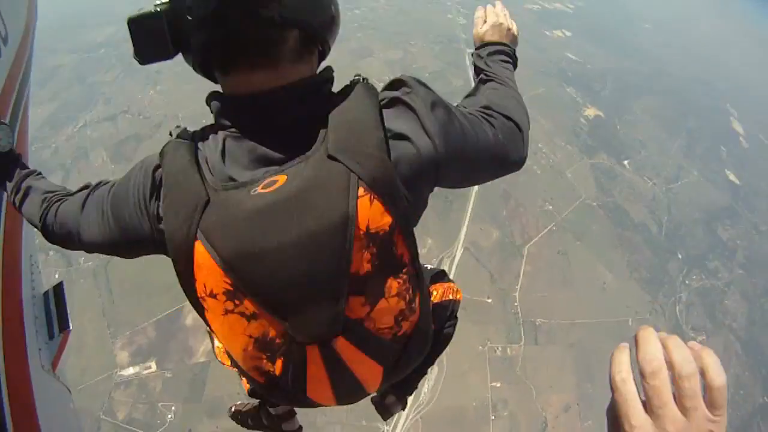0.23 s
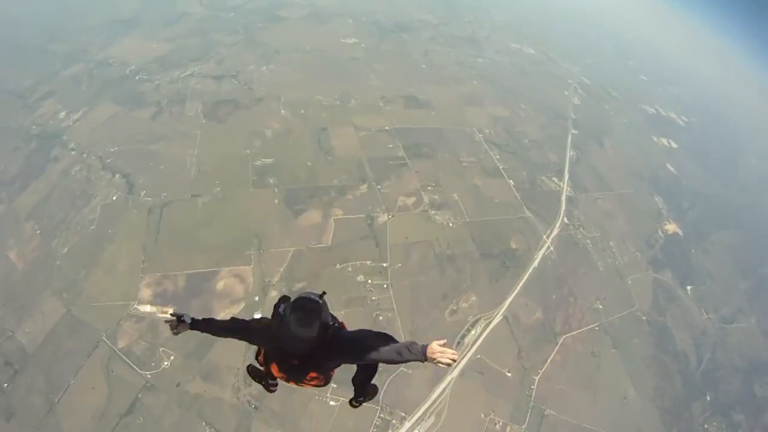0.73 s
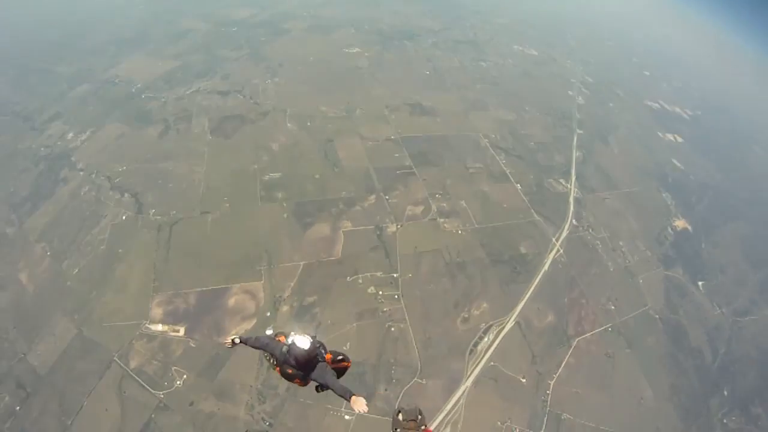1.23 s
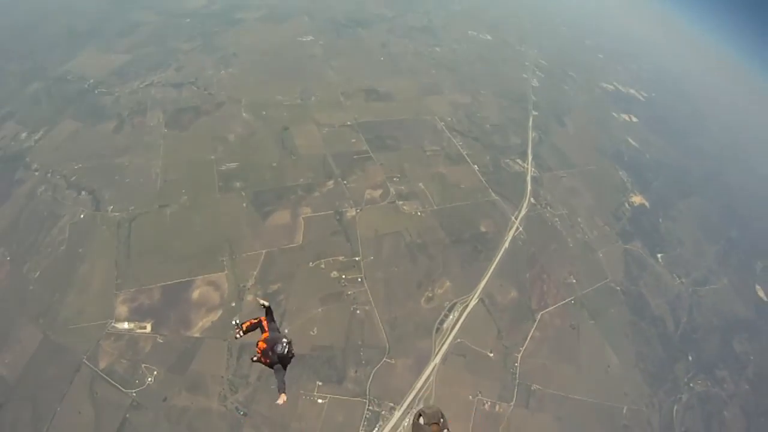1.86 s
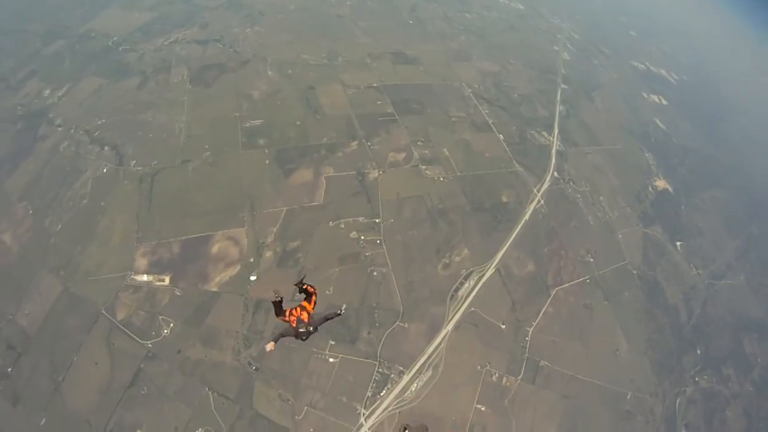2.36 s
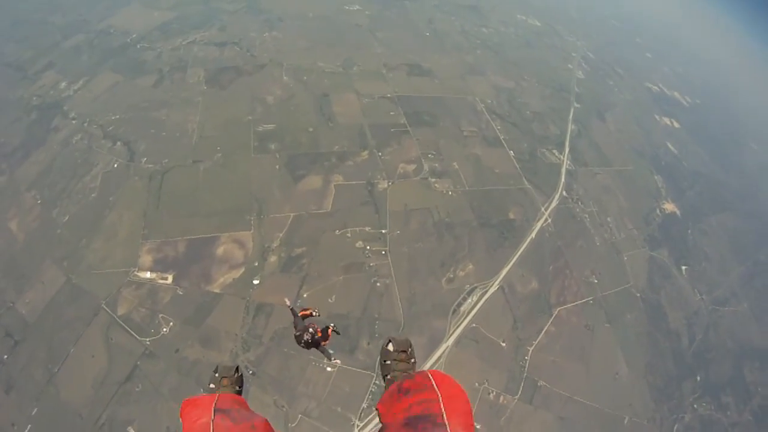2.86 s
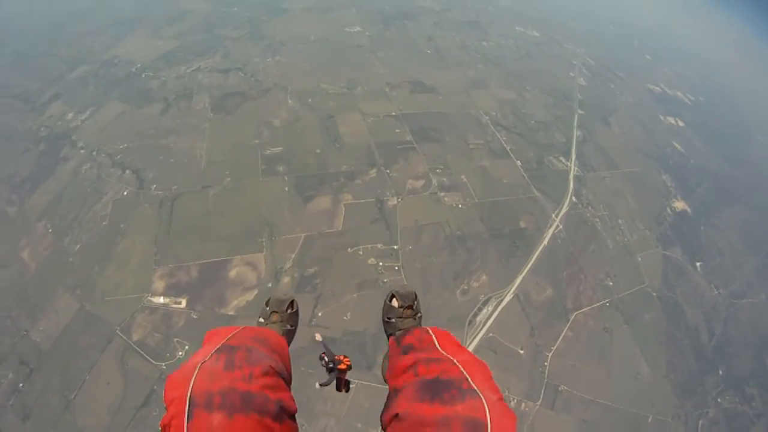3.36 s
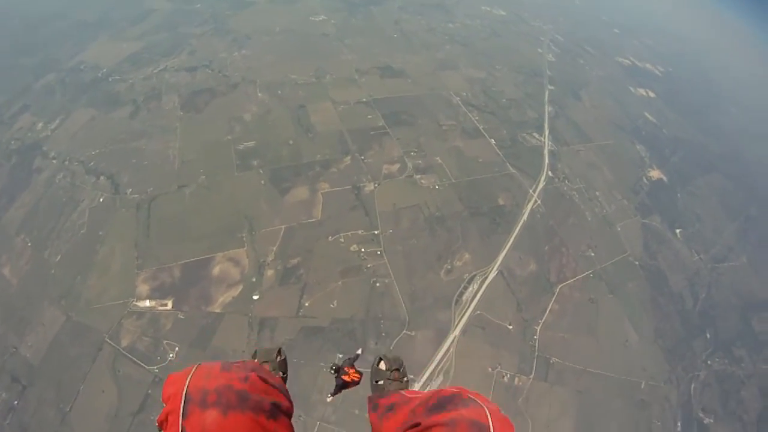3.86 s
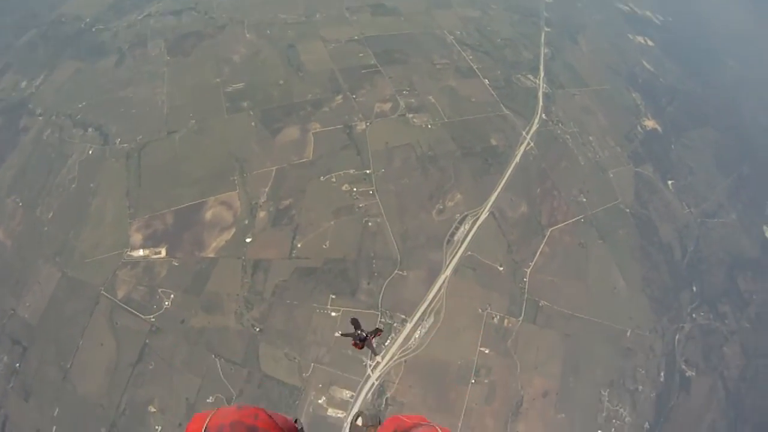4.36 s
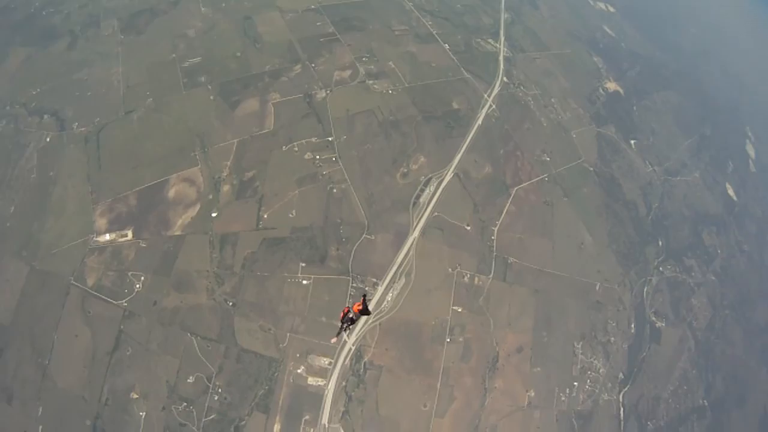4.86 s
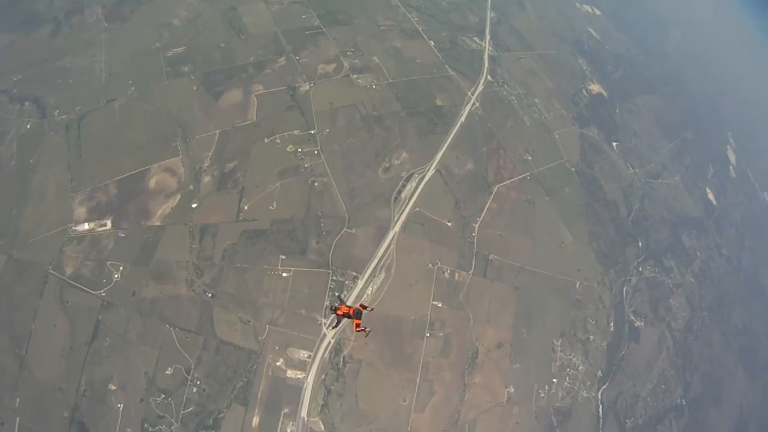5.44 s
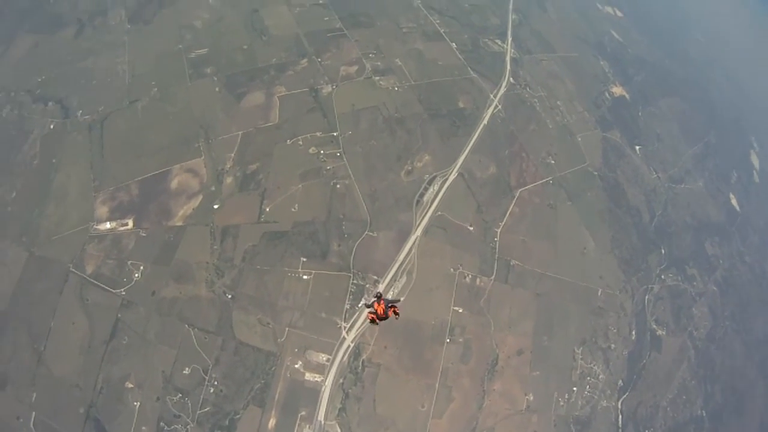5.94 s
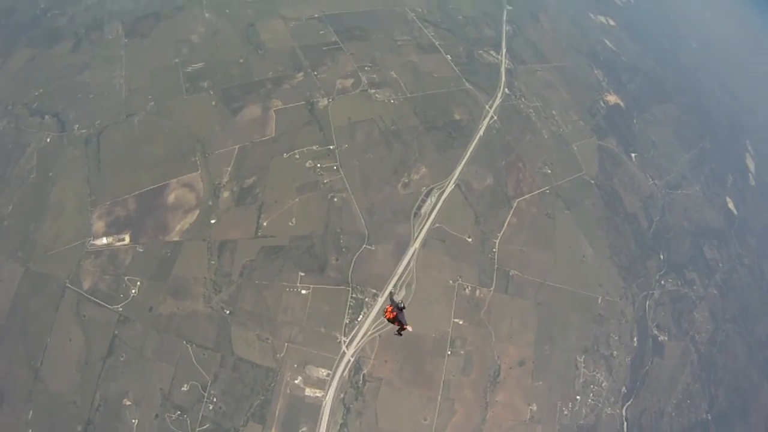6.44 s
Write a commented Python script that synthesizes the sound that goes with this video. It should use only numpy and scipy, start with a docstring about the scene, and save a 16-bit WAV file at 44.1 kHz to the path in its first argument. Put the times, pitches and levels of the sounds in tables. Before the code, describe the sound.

High in open air, wind blasts a helmet camera's microphone without pause. It starts as a strong, bright roar, drops within two seconds to a weaker rush over heavy low buffeting, then gets choppy with thumps, sudden lulls and short ripping gusts. The roar builds again late, with a low drone under it. The sound is close, mono, gritty and slightly overloaded, with no echo.

```python
"""A roar of wind heard by a helmet camera in free fall, with low buffeting, thumps and short rips of air.
Noise rings the housing's resonances for the slipstream; an unsteady tone and noise bands make the helmet's wake.
Big eddies thump, most swell the roar, and each leaves a lull. Gusts blow a slot that answers like a small pipe.
A low drone rises late. Slow sample-and-hold in the camera mirrors the roar into a gritty, banded hiss."""
import sys
import numpy as np
from scipy import signal
from scipy.fft import rfft, irfft, next_fast_len
from scipy.io import wavfile
from scipy.ndimage import uniform_filter1d, map_coordinates

SR = 44100
rng = np.random.default_rng(int(sys.argv[2]) if len(sys.argv) > 2 else 0)


def master_out(mix):
    """Clip the mix to full scale and print it as 16-bit PCM to the path in sys.argv[1]."""
    frames = np.transpose(np.atleast_2d(mix))
    ceiling = np.clip(frames, -1, 1)
    pcm = np.round(ceiling * 32767).astype(np.int16)
    wavfile.write(sys.argv[1], SR, pcm)


N = 295911

# Air stream before layer trims: (time [s], roar level [dB])
STREAM = [(0, -17.5), (.28, -16), (.55, -15.5), (.85, -20), (1.15, -24.5), (1.42, -26.5), (1.68, -30.5),
          (2.1, -27), (2.47, -23), (2.8, -27), (3.25, -24.5), (3.7, -26.5), (4.17, -23), (4.72, -29.5),
          (4.92, -21), (5.7, -19.5), (6.42, -17.5), (6.71, -20.5)]
# Flow as the head turns: (time [s], treble tilt [dB], seam sizzle [dB], lumpiness [1 = usual])
HEAD_FLOW = [(0, 2.5, 7.5, 0.58), (.6, -1, 2, .4), (1.2, 0.5, -1.5, 1.1), (1.75, -2.5, 3, 1.23),
             (2.8, -0.5, 1.5, 1.06), (3.05, -1, 0.5, 1.46), (3.4, 1.5, 7.5, 1.36), (4.25, -3, -1.5, 1.2),
             (4.9, 0.5, 7.5, 1.3), (5.35, -4.5, -5.5, 0.82), (6.05, -2, -0.5, .8), (6.5, -3, -4, 0.59),
             (6.71, -1, 5.5, 2.05)]
# Housing body resonances: (centre [Hz], width [Hz], relative level [dB])
BODY_MODES = [(777, 83, -4.5), (939, 157, -2.5), (1125, 52, 4), (1235, 70, -1), (1434, 380, -5),
              (1730, 276, -5.5)]
# Brighter housing cavity resonances: (centre [Hz], width [Hz], relative level [dB])
CAVITY_MODES = [(2048, 314, 2.5), (2340, 235, -1), (2738, 120, -6), (3050, 420, -13.5), (3624, 397, -10)]
# Sizzling housing seams: (centre [Hz], width [Hz], relative level [dB])
SEAM_MODES = [(4130, 470, -15), (4750, 820, 3.5), (4870, 240, 0.5), (5510, 810, -6.5)]
# Helmet wake before trims: (time [s], slow heaving [dB], buffet [dB], flutter [dB])
WAKE_LEVELS = [(0, -33, -24, -28.5), (.3, -37, -20, -23), (.7, -42, -26, -23), (.82, -25, -19.5, -21),
               (1.38, -15.5, -19, -30), (1.95, -21, -19, -27.5), (2.5, -26, -16, -26.5),
               (2.85, -21, -26, -31.5), (3.1, -22.5, -21.5, -28), (3.85, -26, -18, -34),
               (4.25, -19, -19, -26.5), (4.52, -23, -16.5, -35), (5.3, -28, -17.5, -25),
               (5.85, -33, -18.5, -24), (6.45, -28, -20, -24), (6.71, -40, -19.5, -24.5)]
# Eddy shedding: (time [s], mean rate [Hz], share of wake amplitude before trim [0-1])
SHEDDING_TRACK = [(0, 80, 0.9), (.5, 80.15, 0.9), (.85, 69.9, 0.25), (1.15, 41.8, 0.76), (1.8, 47.7, 0.9),
                  (2.2, 67, 0.65), (3.2, 70.9, 0.58), (3.6, 90.5, 0.82), (4.1, 81.12, 0.43),
                  (4.7, 88.03, .78), (5.3, 88.1, 0.84), (6.71, 87, 0.49)]
# Wake noise spectra: (frequency [Hz], relative density [dB])
HEAVE_SPECTRUM = [(8, -37), (20, -9), (32, -11), (45, 6), (55, -2), (75, -22), (140, -64)]
BUFFET_SPECTRUM = [(30, -66), (55, -4.5), (80, 4), (120, -5), (160, -11.5), (240, -28.5), (500, -59)]
FLUTTER_SPECTRUM = [(70, -35), (140, 0), (220, 0.5), (330, -4.5), (500, -12), (700, -16), (1200, -21),
                    (3000, -68)]
# Big eddies at the microphone: (time [s], signed push before trim, swell before [dB], lull after [dB])
BIG_EDDIES = [(0.832, -.4, 2.5, 3.5), (0.998, -0.13, -1, 2), (1.285, -0.04, -3, 4.5),
              (1.576, 0.35, -0.5, 1.5), (1.967, 0.46, 8, 2), (2.53, .7, 5.5, 0.5), (2.639, 0.32, 9, 6),
              (2.801, .58, 0, 2.5), (2.93, 0.54, 12.5, 13), (3.32, -0.71, 4, 1), (3.476, 0.58, 3.5, 0.5),
              (3.955, -0.17, -1, 7.5), (4.22, 0.33, 7.5, 4.5), (4.328, 0.49, 9.5, 2.5), (5.344, .1, 5, 3.5),
              (5.484, 0.4, -1.5, 4.5), (5.89, 0.24, -3, 5), (6.509, 0.43, -1, 7)]
# Strongest gusts across the slot: (middle [s], level before trim [dB], half-length to 1/e^2 [s])
STRONG_GUSTS = [(0.534, -15, 0.01), (0.996, -25, 0.01), (1.169, -14.5, 0.0058), (1.218, -24.5, 0.011),
                (1.285, -22.5, 0.0057), (1.388, -24.5, 0.018), (1.953, -32, .014), (2.15, -22, 0.0077),
                (2.327, -15, 0.0038), (2.42, -20, 0.0094), (2.634, -13, .012), (2.731, -23, 0.0098),
                (2.922, -21, 0.014), (3.033, -16.5, 0.0075), (3.187, -18.5, 0.032), (3.256, -23, 0.015),
                (3.316, -12, 0.016), (3.395, -20, .009), (3.454, -18, 0.013), (3.48, -14, 0.016),
                (3.574, -14, 0.012), (3.62, -18, 0.028), (3.675, -16, 0.013), (3.837, -20, 0.025),
                (3.95, -21.5, 0.0086), (3.997, -17.5, .012), (4.046, -14.5, 0.0074), (4.1, -16.5, 0.011),
                (4.211, -21.5, 0.01), (4.31, -15, 0.011), (4.467, -17, 0.0076), (4.496, -14, .007),
                (4.53, -16, 0.011), (4.584, -14.5, 0.012), (4.651, -16.5, 0.018), (4.695, -13.5, 0.0061),
                (4.774, -14, 0.01), (4.843, -17.5, 0.032), (4.892, -17, .015), (5.104, -16, 0.0066),
                (5.142, -16.5, 0.019), (6.045, -10, 0.0057), (6.146, -16.5, .011), (6.638, -16.5, 0.0099),
                (6.682, -15, 0.015)]
# Slot pipe modes: (centre [Hz], width [Hz], relative level [dB])
SLOT_MODES = [(1040, 430, -4.5), (2120, 640, -3.5), (2497, 410, 3), (3630, 440, -9.5), (4680, 790, -13)]
# Brief edge whistle: (middle [s], level [dB], half-length to 1/e^2 [s])
WHISTLE_BURST = [(4.397, -14, 0.0025)]
# Edge tone: (centre [Hz], width [Hz], relative level [dB])
EDGE_MODE = [(4870, 250, 3)]
# Drone: (time [s], level [dB])
DRONE_LEVEL = [(0, -50), (5.2, -39), (5.65, -27), (6.71, -26)]
# Drone spectrum: (frequency [Hz], relative density [dB])
DRONE_SPECTRUM = [(80, -60), (110, -16), (138, -0.5), (165, -3), (210, -22), (350, -70)]

# Swell before a big eddy; its cut-off just after the hit; fading lull
BUILD_S, CUT_LAG_S, CUT_S, RECOVER_S = 0.03, 0.0048, 0.0088, 0.065
WAKE_LULL_SHARE = 1  # share of a lull felt by the wake
SIZZLE_STAYS = 0.23  # share of a lull, in dB, that the sizzle is spared
GUST_LULL_DB, GUST_LULL_LAG_S, GUST_LULL_S = 0.5, 0.026, 0.013
# Weak random gusts; growth is dB per dB of stream level
PUFF_COUNT, PUFF_DB, PUFF_GROWTH, PUFF_SCATTER_DB, PUFF_S = 48, -25, 0.26, 2, 0.011
SAMPLING_HZ, HOLD_STEPS, TOP_HZ = 12000, 4, 15300


def amp(db):
    """Decibels to amplitude gain."""
    return 10 ** (np.asarray(db) / 20)


def unit(x):
    """Scale x to rms 1."""
    return x / np.sqrt(np.mean(x ** 2) + 1e-20)


def curves(rows):
    """Interpolate each column after the time to one value per sample."""
    time_s, *columns = np.transpose(rows)
    t = np.arange(N) / SR
    return [np.interp(t, time_s, column) for column in columns]


def wobble(knots_hz):
    """Smooth random curve through knots_hz random knots a second."""
    knots = rng.standard_normal(8192)
    return map_coordinates(knots, [np.arange(N) * knots_hz / SR], mode="mirror")


def filtered(x, response):
    """Apply a gain given as a function of frequency in Hz."""
    size = next_fast_len(N + SR // 2)
    spectrum = rfft(x, size) * response(np.fft.rfftfreq(size, 1 / SR))
    return irfft(spectrum, size)[:N]


def rumble(spectrum, evenness):
    """Shaped noise at rms 1; evenness (0-1) irons out its slow swells."""
    f_hz, db = np.transpose(spectrum)
    noise = filtered(rng.standard_normal(N), lambda hz: amp(np.interp(np.log(hz + 1), np.log(f_hz), db)))
    power = uniform_filter1d(uniform_filter1d(noise * noise, size=2000), size=2000)
    power = np.abs(power)
    return unit(noise / (power + 1e-12) ** (np.clip(evenness, 0, 1) / 2))


def blown(modes, drive, skirt):
    """Noise of strength drive rings the modes; a larger skirt makes their flanks fall faster."""
    hz = np.fft.rfftfreq(4096, 1 / SR)
    power = np.zeros(len(hz))
    for centre_hz, width_hz, db in modes:
        offset = 2 * (hz - centre_hz) / width_hz
        power += amp(db) ** 2 / (1 + offset ** 2 / skirt) ** skirt
    # Minimum phase: the ring follows the push
    cepstrum = irfft(np.log(power + 1e-12) / 2)
    half = len(cepstrum) // 2
    causal = np.r_[cepstrum[0], 2 * cepstrum[1:half], np.zeros(half)]
    ring = irfft(np.exp(rfft(causal)))
    return signal.fftconvolve(drive * rng.standard_normal(N), ring / np.linalg.norm(ring))[:N]


def swells(rows):
    """Sum of Gaussian bells from (middle [s], height, half-length to 1/e^2 [s])."""
    t = np.arange(N) / SR
    total = np.zeros(N)
    for middle_s, height, length_s in rows:
        near = np.abs(t - middle_s) < 2 * length_s
        total[near] += height * np.exp(-2 * ((t[near] - middle_s) / length_s) ** 2)
    return total


def slipstream(buffeting, suction_db=0.68, body_db=-2, cavity_db=0, sizzle_db=-18,
               surge_db=1.31, lump_db=2.22, grit_db=1.0, drift_db=-0.5):
    """Lumpy turbulence rings body, cavity and seams, harder when buffeting pressure goes negative."""
    stream_db, = curves(STREAM)
    tilt_db, seam_db, lumpiness = curves(HEAD_FLOW)
    swell_db, lull_db = eddy_sway()
    roar_db = stream_db + swell_db - lull_db - gust_lull() + drift_db * wobble(18)

    lumps_db = surge_db * wobble(40) + lump_db * wobble(170) + grit_db * wobble(600)
    lumps_db -= suction_db * unit(buffeting)
    lumps = unit(amp(lumpiness * lumps_db))
    body_lumps = unit(lumps ** 0.72 * amp(1.28 * wobble(45)))
    seam_lumps = unit(lumps ** 1.28 * amp(1.2 * wobble(90)))

    body = blown(BODY_MODES, amp(roar_db + body_db - tilt_db / 2) * body_lumps, skirt=1.35)
    cavity = blown(CAVITY_MODES, amp(roar_db + cavity_db + tilt_db / 2) * lumps, skirt=2.3)
    seam_level_db = roar_db + sizzle_db + seam_db + SIZZLE_STAYS * lull_db
    sizzle = blown(SEAM_MODES, amp(seam_level_db) * seam_lumps, skirt=4.1)
    return body + cavity + sizzle


def eddy_sway():
    """Swell and lull in dB: a big eddy sways the air ahead of it, then leaves a sudden lull."""
    t = np.arange(N) / SR
    swell_db, lull_db = np.zeros((2, N))
    for hit_s, _, rise_db, drop_db in BIG_EDDIES:
        near = np.abs(t - hit_s) < 2 * (BUILD_S + RECOVER_S)
        since_s = t[near] - hit_s - CUT_LAG_S
        passed = (1 + np.tanh(since_s / CUT_S)) / 2
        swell_db[near] += rise_db * (1 - passed) * np.exp(-(since_s / BUILD_S) ** 2)
        lull_db[near] += drop_db * passed * np.exp(-(since_s / RECOVER_S) ** 2)
    return swell_db, lull_db


def gust_lull():
    """Brief slackening of the stream, in dB, behind each strong gust."""
    return GUST_LULL_DB * swells([(s + GUST_LULL_LAG_S, 1, GUST_LULL_S) for s, _, _ in STRONG_GUSTS])


def wake(shed_db=-2.5, broad_db=1.9, heave_db=1.2, flutter_db=-1.5, unsteady=0.0777, steep_db=-14):
    """The helmet sheds a fairly regular eddy train amid random heave, buffet and flutter."""
    lull_db = WAKE_LULL_SHARE * eddy_sway()[1]
    heave_level_db, buffet_level_db, flutter_level_db = np.array(curves(WAKE_LEVELS)) - lull_db
    shed_hz, share = curves(SHEDDING_TRACK)
    share = np.clip(share, 0, 1)

    phase = 2 * np.pi * np.cumsum(shed_hz * (1 + unsteady * wobble(45))) / SR
    # A varying second harmonic leans each eddy its own way
    wave = np.sin(phase) + amp(steep_db) * wobble(60) * np.sin(2 * phase)
    eddies = unit(wave * amp(2.55 * wobble(28) + 1.9 * wobble(90)))

    heave = amp(heave_level_db + heave_db) * rumble(HEAVE_SPECTRUM, evenness=0.77)
    buffet = amp(buffet_level_db + broad_db) * rumble(BUFFET_SPECTRUM, evenness=1.0)
    strength = np.hypot(amp(heave_level_db), amp(buffet_level_db))
    train = share * amp(shed_db) * strength * eddies
    low = train + np.sqrt(1 - share ** 2) * (heave + buffet)

    # Strong eddies break into smaller ones
    breakup = amp(2.86 * wobble(70) + 2 * np.abs(low / strength))
    flutter = unit(rumble(FLUTTER_SPECTRUM, evenness=1.0) * breakup)
    return low + amp(flutter_level_db + flutter_db) * flutter


def thumps(level_db=3, vent_hz=38, core_s=0.0027):
    """Each eddy core is one push that leaks out of the microphone's vent and swings back."""
    vent = signal.butter(2, vent_hz, "highpass", fs=SR, output="sos")
    pushes = swells([(hit_s, push, core_s) for hit_s, push, _, _ in BIG_EDDIES])
    return amp(level_db) * signal.sosfilt(vent, pushes)


def gusts(gust_db=1, push_db=-9, ragged_db=3, whistle_db=0):
    """Ragged jets ring the slot and shove the microphone; an edge whistles once."""
    _, lull_db = eddy_sway()
    strong = swells([(s, amp(db), length_s) for s, db, length_s in STRONG_GUSTS])
    jets = np.hypot(strong, amp(-lull_db) * puffs())
    raggedness = unit(amp(ragged_db * wobble(500)))
    slot = blown(SLOT_MODES, amp(gust_db) * jets * raggedness, skirt=2.2)
    push = amp(push_db) * jets * rumble(FLUTTER_SPECTRUM, evenness=0.69)
    whistle_drive = swells([(s, amp(db + whistle_db), length_s) for s, db, length_s in WHISTLE_BURST])
    return slot + push + blown(EDGE_MODE, whistle_drive, skirt=2.66)


def puffs():
    """Weak gusts at loosely even intervals grow a little with the stream."""
    stream_db, = curves(STREAM)
    times_s = (np.arange(PUFF_COUNT) + rng.random(PUFF_COUNT)) * N / SR / PUFF_COUNT
    levels_db = PUFF_DB + PUFF_SCATTER_DB * rng.standard_normal(PUFF_COUNT)
    growth = amp(PUFF_GROWTH * (stream_db - stream_db.mean()))
    return growth * swells([(s, amp(db), PUFF_S) for s, db in zip(times_s, levels_db)])


def drone():
    """Narrow noise band above the shedding rate, rising as the fall gathers speed."""
    level_db, = curves(DRONE_LEVEL)
    return amp(level_db) * rumble(DRONE_SPECTRUM, evenness=0.69)


def scene():
    """Sum all pressures at one microphone."""
    buffeting = wake() + thumps() + drone()
    return (slipstream(buffeting) + buffeting + gusts())[None]


def record(dry):
    """The camera rounds off peaks near full scale, samples slowly and holds each sample."""
    rounded = dry[0] / (1 + dry[0] ** 4) ** (1 / 4)
    samples = signal.resample_poly(rounded, SAMPLING_HZ, SR)
    # Holding leaves mirror images about the sampling rate
    stairs = np.repeat(samples, HOLD_STEPS)
    held = signal.resample_poly(stairs, SR, SAMPLING_HZ * HOLD_STEPS)
    return filtered(held, lambda hz: 1 / np.sqrt(1 + (hz / TOP_HZ) ** 500))[None]


dry = scene()
out = record(dry)
master_out(out)
```